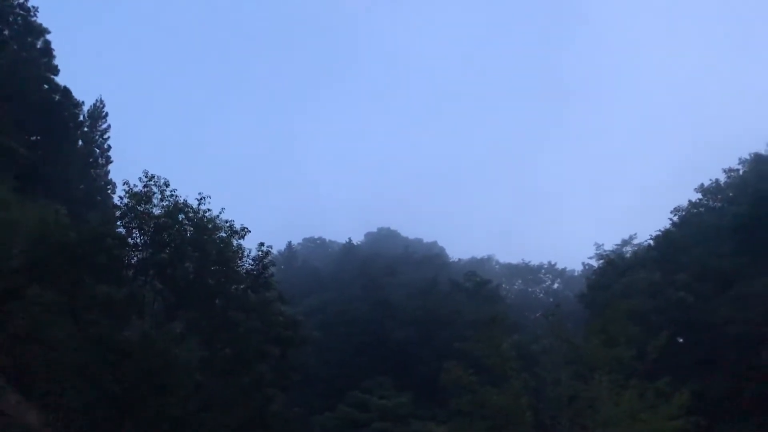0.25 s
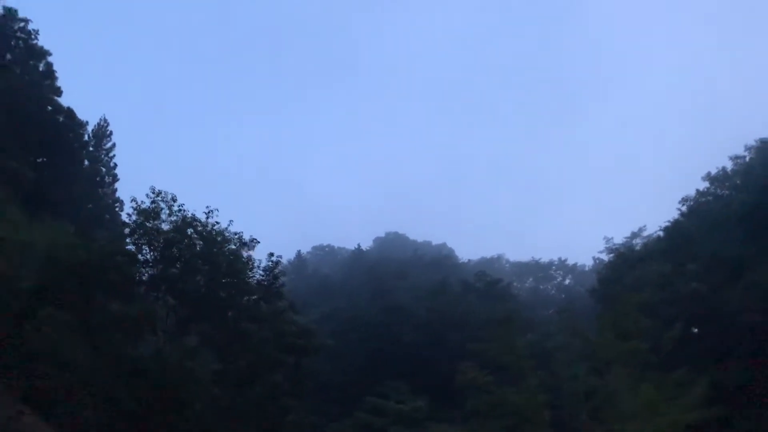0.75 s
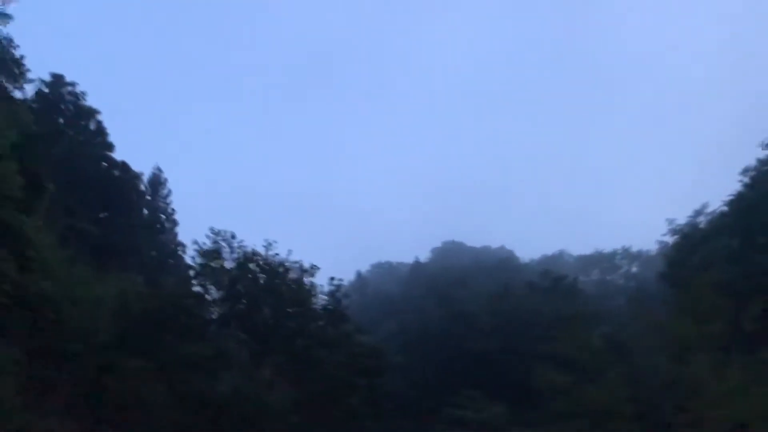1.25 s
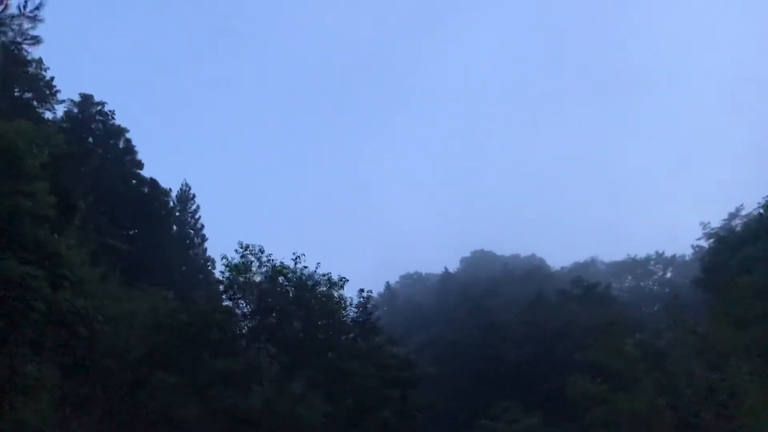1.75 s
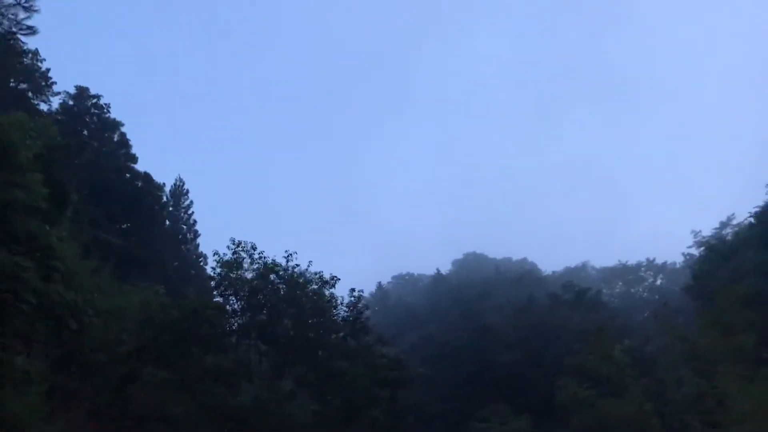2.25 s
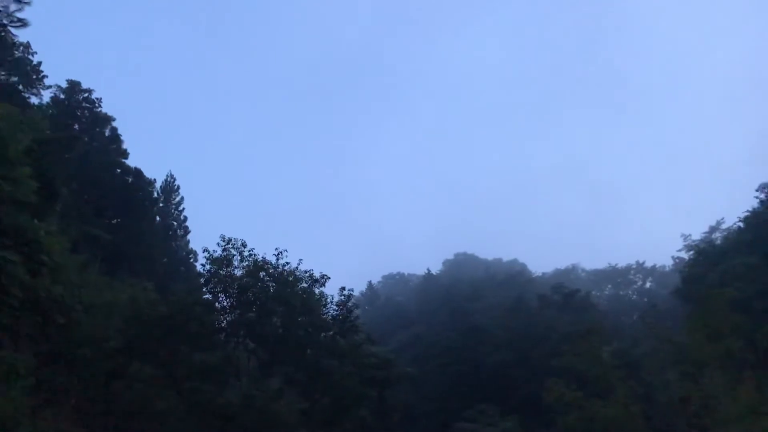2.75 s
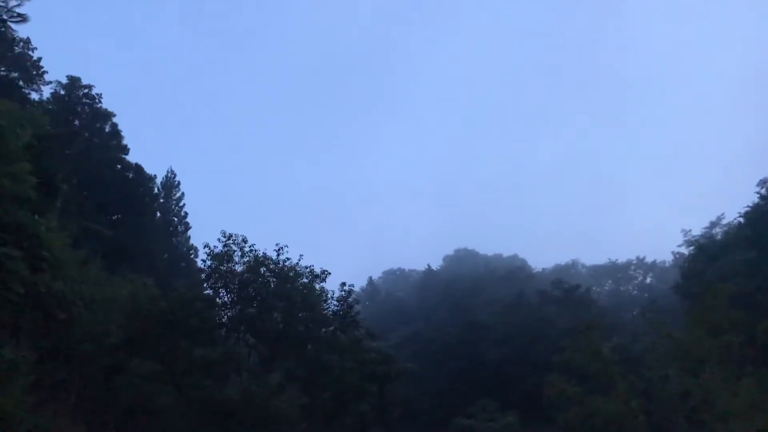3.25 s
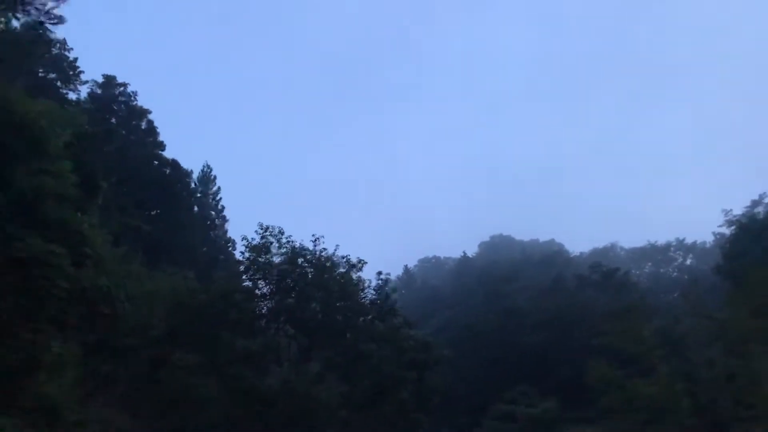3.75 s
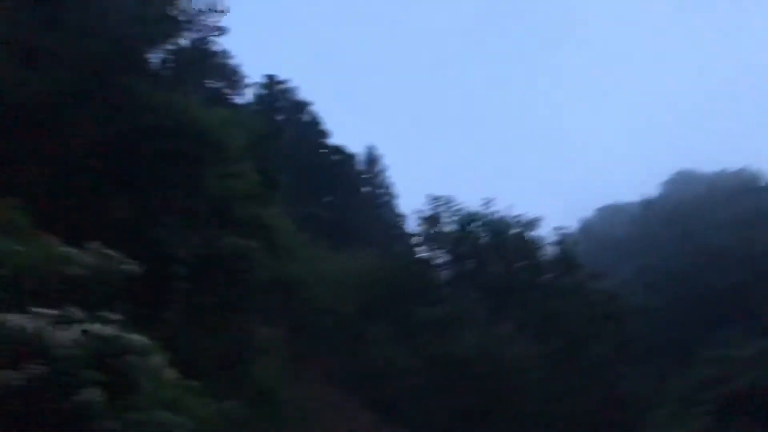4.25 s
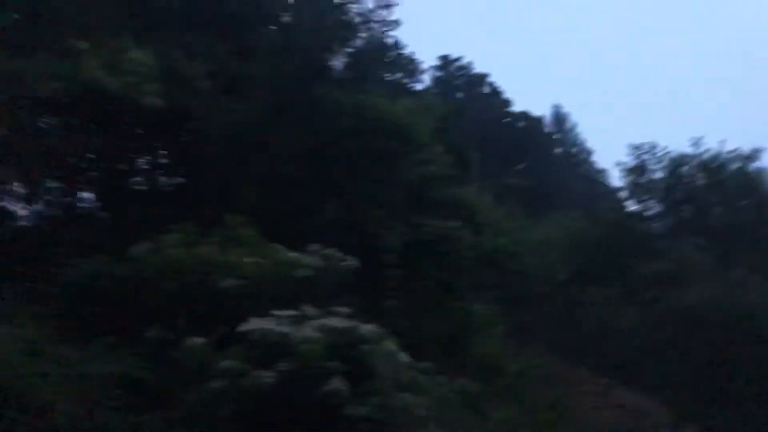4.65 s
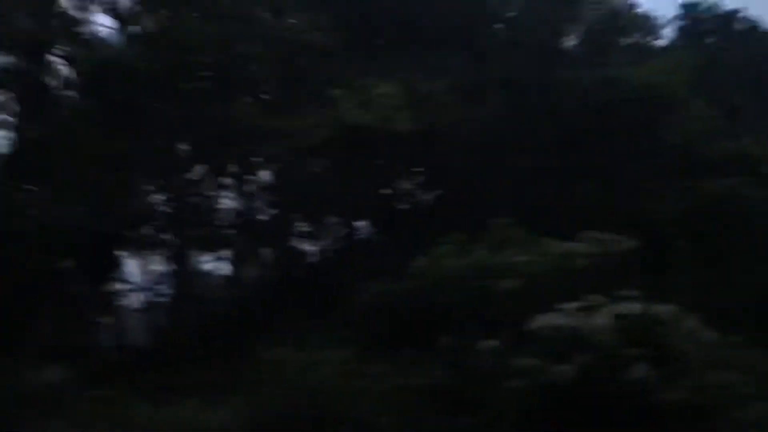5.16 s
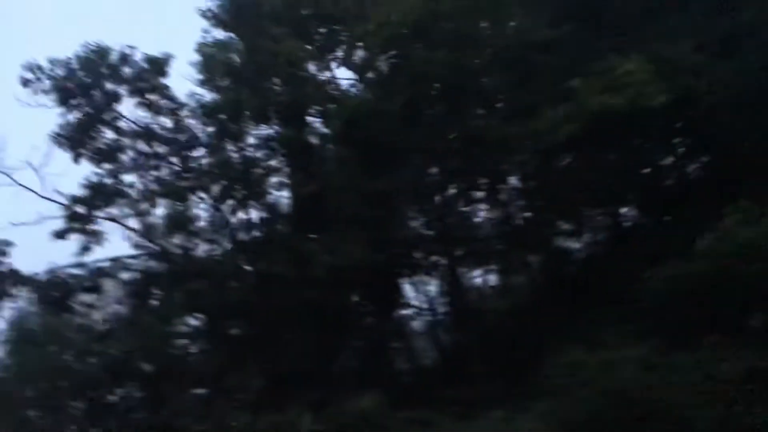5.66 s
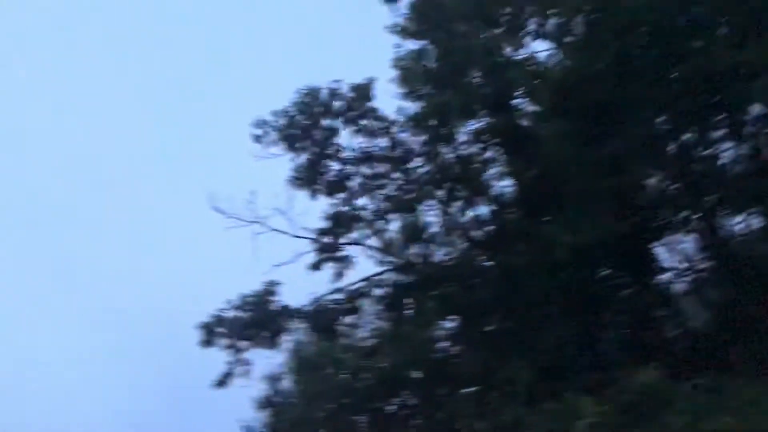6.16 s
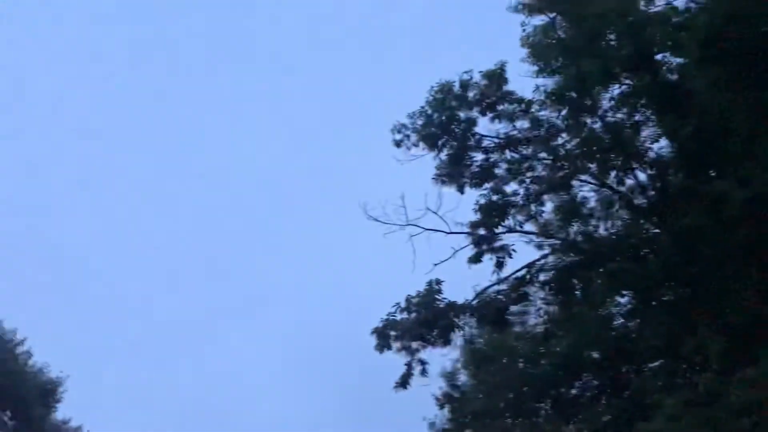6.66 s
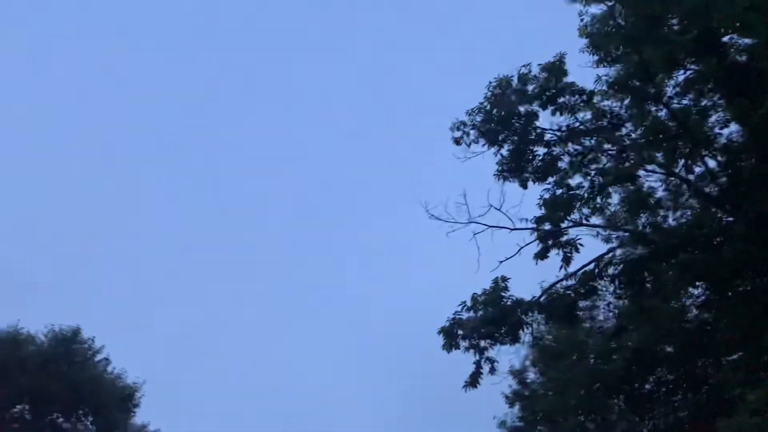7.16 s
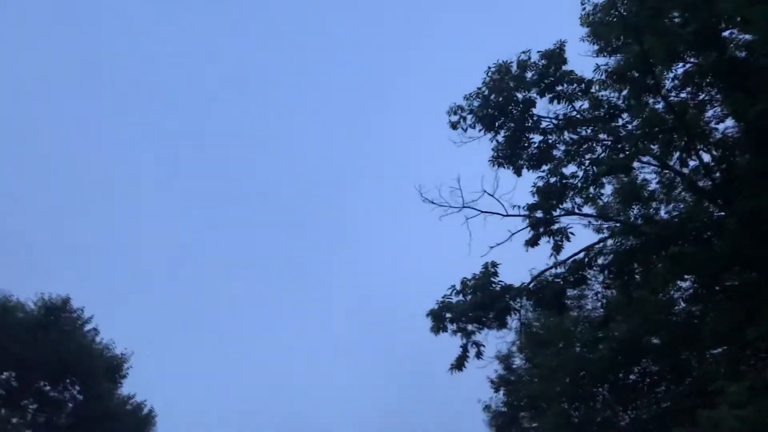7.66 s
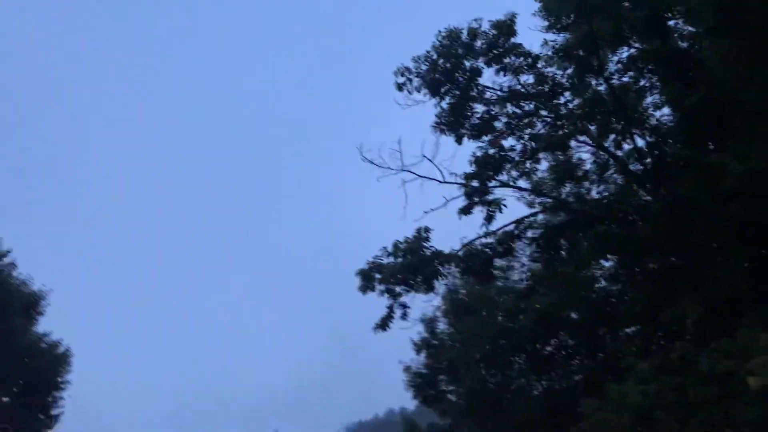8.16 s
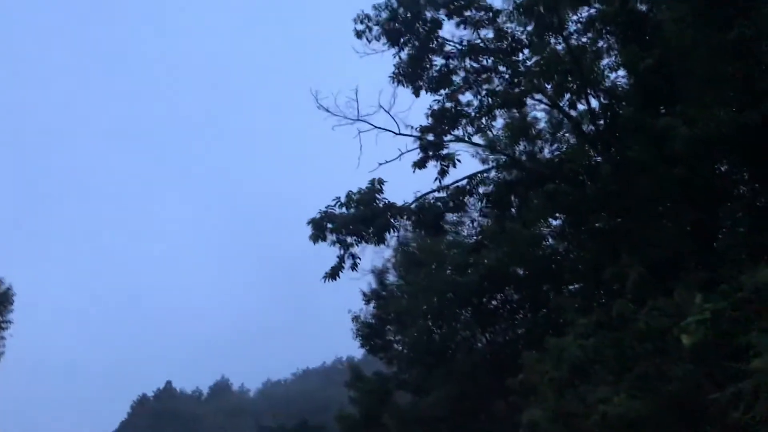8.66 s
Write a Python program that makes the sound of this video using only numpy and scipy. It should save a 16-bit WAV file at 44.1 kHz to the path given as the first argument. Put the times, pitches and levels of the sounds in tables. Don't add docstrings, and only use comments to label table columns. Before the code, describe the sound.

A distant, blurred cicada chorus fills the valley from the start while three closer cicadas pile up into a dense, shimmering pulse. One drops out around four seconds, the others slow and end by about six and a half. Softer answers from across the slopes then carry on, gradually slowing. Small thin bird whistles, a high insect buzz, leaf hiss and barely audible traffic sit behind, in natural outdoor reverberation.

```python
import sys
import numpy as np
from scipy import signal
from scipy.fft import rfft, irfft, next_fast_len
from scipy.io import wavfile
from scipy.ndimage import map_coordinates

SR = 44100
rng = np.random.default_rng(int(sys.argv[2]) if len(sys.argv) > 2 else 0)


def master(y):
    cut = np.clip(np.atleast_2d(y).T, -1, 1)
    pcm = np.round(cut * 32767)
    wavfile.write(sys.argv[1], SR, pcm.astype(np.int16))


def rack_gain(trim_db):
    fader = np.asarray(trim_db, float)
    return 10 ** (fader / 20)


N = 392931
TIME = np.arange(N) / SR


def unit(x):
    return x / np.sqrt(np.mean(np.abs(x) ** 2) + 1e-20)


def along(points, hz):
    f, v = np.transpose(points)
    return np.interp(np.log(hz + 1), np.log(f + 1), v)


def over_time(points):
    return np.interp(TIME, *np.transpose(points))


def wobble(rate):
    return map_coordinates(rng.standard_normal(int(N * rate / SR) + 4), [TIME * rate], order=1)


def coloured(x, spectrum):
    m = next_fast_len(N + 8192)
    gain = rack_gain(along(spectrum, np.fft.rfftfreq(m, 1 / SR)))
    return irfft(rfft(x, m) * gain, m)[:N]


def hiss(spectrum):
    return unit(coloured(rng.standard_normal(N), spectrum))


def swell(t, length, rise, fall):
    nearest_end = np.minimum(t / rise, (length - t) / fall)
    return np.sin(np.pi / 2 * np.clip(nearest_end, 0, 1)) ** 2


# (level/dB, share of the brightness 0-1, fuzz level/dB,
# fuzz offset below the line f/Hz, fuzz width f/Hz)
PARTIALS = [(-7, 0, -1.5, 45, 290), (1.5, 0.14, 1, 61, 240), (-3.5, 0.38, 6, 150, 370),
            (-1, 0.96, 5, 134, 250), (-10, 0.74, 5.5, 240, 550), (-23, 0.6, 11.5, 310, 490),
            (-26.5, 0.9, 1, 460, 750)]


def rib_fuzz():
    hz = np.fft.fftfreq(next_fast_len(N), 1 / SR)
    pedestal_db, pedestal_wider = -21, 5.37
    out = []
    for _, _, db, below_hz, width_hz in PARTIALS:
        noise = rng.standard_normal(len(hz)) + 1j * rng.standard_normal(len(hz))
        x = (hz + below_hz) / width_hz
        hump = 1 / (1 + x ** 4) + rack_gain(pedestal_db) / (1 + (x / pedestal_wider) ** 4)
        out.append(unit(np.fft.ifft(noise * hump)[:N]) * rack_gain(db))
    return out


# (multiple of the stroke rate, level/dB)
STROKE = [(-2, -36), (-1, -20), (1, -28), (2, -36)]


def tymbal(hz, gains, ribs, rough, stroke_db, waver, fuzz):
    n = len(hz)
    grows_db = 3
    turn = 2 * np.pi * np.cumsum(hz * (1 + waver * wobble(90)[:n])) / SR
    beat = turn / ribs + .6 * wobble(70)[:n]
    side_lines = sum(rack_gain(db) * np.exp(1j * m * beat) for m, db in STROKE)
    stroke = rack_gain(stroke_db - 2 * grows_db) * side_lines
    first = np.exp(1j * turn)
    partial, out = 1, 0
    for gain, smear in zip(gains, fuzz):
        partial = partial * first * np.exp(2j * np.pi * rng.uniform())
        stroke = stroke * rack_gain(grows_db)
        jitter = rough * np.roll(smear, rng.integers(N))[:n]
        out = out + gain * np.real(partial * (1 + stroke + jitter))
    return np.sqrt(2) * out


FAR_PARTIALS = [-4, 3, -12, -6.5, -38]
# (t/s, level/dB)
CHORUS = [(0.0, -41.5), (0.4, -46.5), (0.94, -41.5), (1.41, -42), (1.61, -42), (2.36, -45), (2.9, -43.5),
          (4.42, -42), (4.52, -43), (7.2, -46.5), (7.84, -45.5), (8.91, -48.5)]


def chorus(fuzz, count=9):
    out = 0
    for place, (beat, start) in zip(np.linspace(-1, 1, count), rng.uniform(-1, 1, (count, 2))):
        cycle = (TIME * (7.6 + 0.7946 * beat) + start) % 1
        gate = swell(cycle, 0.53, rise=0.087, fall=0.4) * rack_gain(1.6 * wobble(0.51))
        hz = (2115 + 75 * place) * (1 + .009 * wobble(1.2))
        voice = tymbal(hz, rack_gain(FAR_PARTIALS), ribs=7.3, rough=0.64, stroke_db=11.0, waver=0.001938, fuzz=fuzz)
        out = out + gate * voice
    return rack_gain(over_time(CHORUS) - 6.0) * unit(out)


# (f/Hz, density level/dB per Hz)
BUZZ = [(3240, -45.5), (5500, -57), (6170, -7), (6660, -8.5), (7560, 1), (8820, 0), (9080, -13),
        (9220, -6.5), (10000, -22), (10300, -19), (13400, -53), (22000, -120)]
# (start f/Hz, end f/Hz)
TOOTH_HZ = (6500, 9500)
# (t/s, level/dB)
CRICKET = [
    (3.5, -60),
    (6, -55),
]


def bush_cricket():
    tooth_rate = 455
    teeth = np.diff(np.floor(tooth_rate * TIME), prepend=0)
    ring = signal.chirp(TIME[:SR // tooth_rate], TOOTH_HZ[0], 1 / tooth_rate, TOOTH_HZ[1])
    teeth = np.convolve(teeth, ring)[:N]
    flutter = np.exp(3j * np.cos(2 * np.pi * 102 * TIME + .3 * wobble(5)))
    clicks = signal.hilbert(coloured(teeth, BUZZ), next_fast_len(N))[:N]
    near = rack_gain(over_time(CRICKET)) * unit(np.real(clicks * flutter ** 0.55))
    further = rack_gain(-48 + 0.48 * wobble(130) + 0.52 * wobble(5.8)) * hiss(BUZZ)
    return further + near


# (f/Hz, density level/dB per Hz)
AIR = [(14, -52), (24, -17), (41, -10), (59, 0.5), (86, -3), (129, -3), (156, -11), (376, -16.5),
       (439, -21.5), (589, -19), (1240, -24), (1500, -27), (1950, -16), (3300, -120)]
# (f/Hz, density level/dB per Hz)
LEAVES = [(1000, -120), (1400, -29), (3000, -10.5), (5500, 1.5), (10500, 0), (11500, -4.5), (15700, -9.5)]
# (f/Hz, density level/dB per Hz)
ROAD = [(60, -30), (120, 4), (250, 2), (450, -4), (900, -34), (2000, -120)]
# (t/s, level/dB)
TRAFFIC = [(0.1, -71.5), (0.35, -69), (1.41, -67.5), (1.46, -75.5), (5.5, -78), (6.2, -72), (7.2, -73),
           (8.2, -72.5), (8.4, -75.5), (8.91, -70.5)]


def air():
    road = rack_gain(over_time(TRAFFIC) + 1.65 * wobble(6.5)) * hiss(ROAD)
    return rack_gain(-65.5) * hiss(AIR) + road + rack_gain(-64.5) * hiss(LEAVES)


def singer(rows, pitch, fuzz, ribs, stroke_db, length, top_db):
    s, db, bright, rough_db = np.transpose(rows)
    span = slice(max(0, int((s[0] - .1) * SR)), int((s[-1] + .1) * SR))
    t = TIME[span]
    near = np.searchsorted((s[1:] + s[:-1]) / 2, t)
    since = t - s[near] + 0.026
    gate = swell(since, length, rise=.015, fall=.026)
    gains = []
    for k, row in enumerate(PARTIALS):
        level = db + row[0] + row[1] * bright + top_db * (k > 3)
        gains.append(gate * rack_gain(level)[near])
    arch = 1.001 - .004 * np.clip(1.7 * since / length - 1.05, -1.1, 1) ** 2
    hz = np.interp(s, *np.transpose(pitch))[near] * arch
    stroke_db = stroke_db + 7 * np.exp(-(t - s[0]) / 0.84)
    out = np.zeros(N)
    out[span] = tymbal(hz, gains, ribs, rack_gain(rough_db)[near], stroke_db, waver=0.00047, fuzz=fuzz)
    return out


# (first t/s, last t/s, gap t/s, slowing t/s, first f/Hz, last f/Hz)
PHRASES = [
    (.06, .6, .12, 0, 2135, 2125),
    (4.22, 5.6, .115, 0, 2300, 2265),
    (5.74, 8.9, .119, .0004, 2225, 2176),
    (6.03, 8.9, .136, 0, 2140, 2118),
    (7.64, 8.9, .125, 0, 2255, 2236),
]
# (second partial level/dB, fourth over second level/dB)
PHRASE_LEVELS = [(-49, -20), (-60, -11), (-52, -19.5), (-56.5, -16), (-58.5, -29)]


def neighbours(fuzz):
    out = 0
    for (start, end, gap, slowing, high, low), (db, bright) in zip(PHRASES, PHRASE_LEVELS):
        n = np.arange(40)
        s = start + gap * n + slowing * n * n
        size = db + 1.2 * rng.standard_normal(len(n))
        rows = [(at, level, bright, -9) for at, level in zip(s, size) if at < end]
        pitch = [(start, high), (end, low)]
        out = out + singer(rows, pitch, fuzz, ribs=6.5, stroke_db=-29.0, length=0.059, top_db=3.0)
    return out


# (level/dB, brightness level/dB, roughness level/dB)
SCATTER_DB = [1.0, 1.2, 2]


def phrase(marks, rows, end):
    rough_db, rough_per_db, firm_db = -14, .85, -36
    n = np.arange(marks[-1] + 1)
    even = np.transpose([np.interp(n, marks, column) for column in np.transpose(rows)])
    s, db, bright = np.vstack([even, *end]).T
    scatter = (rng.standard_normal((len(s), 3)) * SCATTER_DB).T
    level, colour, grit = scatter * (np.arange(len(s)) < len(n))
    rough = rough_db + rough_per_db * (firm_db - db) + grit
    return np.transpose([s, db + level, bright + colour, rough])


# (middle t/s, second partial level/dB, fourth over second level/dB)
HIGH_SINGER = [(0.33, -49.5, -17), (0.648, -42.5, -6.5), (1.007, -47, -2), (1.881, -38, -13),
               (2.666, -41.5, -11.5), (3.309, -47, -4), (3.44, -47, -2.5), (4.036, -50, -0.5)]
HIGH_END = [(4.217, -58, -1), (4.374, -50, 3.5), (4.6, -43, -3), (4.827, -45.5, 2), (5.086, -43.5, 2),
            (5.417, -43, -1)]
LOUD_SINGER = [(0.905, -36.5, -6), (1.241, -41.5, 5), (1.723, -37, -1.5), (1.855, -35, -3.5),
               (2.505, -35, -2.5), (2.766, -38.5, -2.5), (3.476, -41.5, 5.5), (3.828, -45, 5.5),
               (4.157, -39.5, 0.5)]
LAST_SINGER = [(0.69, -44.5, -12), (1.264, -35.5, -2.5), (2.001, -45, 1.5), (2.639, -45, 4.5),
               (3.377, -45.5, 4), (3.775, -46, 5.5), (4.345, -46, 6), (4.5, -45, 2), (4.838, -47, 0)]
LAST_END = [(5.039, -48.5, 5.5), (5.312, -45.5, -0.5), (5.633, -46, 2), (5.817, -51, -20),
            (5.98, -50, -1.5), (6.109, -71, -20), (6.389, -48, -4.5)]
HIGH_MARKS = [0, 3, 6, 13, 19, 24, 25, 29]
LOUD_MARKS = [0, 3, 7, 8, 13, 15, 20, 22, 23]
LAST_MARKS = [0, 5, 11, 16, 22, 25, 29, 30, 32]
# (t/s, f/Hz)
HIGH_PITCH = [(0.33, 2175), (0.54, 2235), (0.65, 2256), (0.883, 2253), (1.257, 2235), (2.015, 2217),
              (3.18, 2204), (4.038, 2186), (5.41, 2139)]
LOUD_PITCH = [(0.905, 2166), (1.015, 2190), (1.13, 2190), (1.479, 2175), (1.856, 2158), (2.637, 2150),
              (3.041, 2134), (3.48, 2124), (4.155, 2098)]
LAST_PITCH = [(0.693, 2112), (0.92, 2155), (1.142, 2156), (1.631, 2136), (2.0, 2127), (2.759, 2118),
              (4.348, 2107), (5.63, 2077), (6.388, 2073)]


def near_singers(fuzz):
    high = phrase(HIGH_MARKS, HIGH_SINGER, HIGH_END)
    loud = phrase(LOUD_MARKS, LOUD_SINGER, [])
    last = phrase(LAST_MARKS, LAST_SINGER, LAST_END)
    out = singer(high, HIGH_PITCH, fuzz, ribs=5.3, stroke_db=4.5, length=0.065, top_db=1.0)
    out = out + singer(loud, LOUD_PITCH, fuzz, ribs=6.6, stroke_db=-3.5, length=0.054, top_db=1.0)
    return out + singer(last, LAST_PITCH, fuzz, ribs=6.3, stroke_db=2.5, length=0.063, top_db=-1.0)


def add_tone(out, start, db, shape, hz):
    tone = np.sin(2 * np.pi * np.cumsum(hz) / SR)
    out[round(start * SR):][:len(hz)] += np.sqrt(2) * rack_gain(db) * shape * tone


# (start
# t/s, length t/s, from f/Hz, to f/Hz)
SLIDES = [(.355, .04, 3700, 2400), (6.33, .03, 5200, 4500), (6.63, .03, 5000, 4500),
          (6.75, .035, 5200, 4500), (7.21, .05, 4500, 5200), (7.39, .04, 4600, 5200),
          (7.67, .07, 4800, 4880), (7.74, .04, 3800, 3450), (7.78, .022, 3450, 2600),
          (7.805, .02, 2800, 3200), (8.33, .36, 5230, 5350), (1.65, .07, 3400, 3370),
          (1.78, .08, 3400, 3390)]
SLIDE_LEVELS = [-69, -66, -68, -66, -64, -65, -59, -66, -67, -71, -61, -66, -69]


def bird_slides():
    hoarse_hz, hoarse_hz_per_s = 50, 330
    out = np.zeros(N + SR)
    for (s, length, start, end), db in zip(SLIDES, SLIDE_LEVELS):
        t = np.arange(int(length * SR)) / SR
        hoarse = (hoarse_hz + hoarse_hz_per_s * length) * wobble(700)[:len(t)]
        hz = start + (end - start) * t / length + hoarse
        add_tone(out, s, db, swell(t, length, .25 * length, .25 * length), hz)
    return out[:N]


# (start t/s, length t/s, top f/Hz)
WHISTLES = [(1.275, .06, 3240), (1.588, .096, 3420), (2.905, .075, 2980), (3.535, .075, 2990),
            (4.054, .08, 3010), (4.49, .096, 3400), (5.285, .078, 2970), (6.153, .07, 2990),
            (6.743, .072, 3000), (7.262, .096, 3400)]
WHISTLE_LEVELS = [-66, -64, -67, -63, -61, -60, -62.5, -62.5, -62, -62]


def bird_whistles():
    out = np.zeros(N + SR)
    for (s, length, top), db in zip(WHISTLES, WHISTLE_LEVELS):
        t = np.arange(int(length * SR)) / SR
        u = t / length
        rise = .125 * np.exp(-u / .17)
        drop = .19 * np.clip((u - .8) / .2, 0, 1) ** 1.3
        fade_db = -9 * np.clip(1 - u / .5, 0, 1) - 7 * np.clip((u - .82) / .04, 0, 1)
        add_tone(out, s, db, swell(t, length, .01, .005) * rack_gain(fade_db), top * (1.005 - rise - drop))
    return out[:N]


# (f/Hz, t60 t/s)
VALLEY = [(1500, 1.25), (5000, 1.24), (9000, 0.73), (12000, 0.33)]


def valley(x):
    hz, t, z = signal.stft(rng.standard_normal(SR), SR, nperseg=256)
    decay = rack_gain(-60 * t / along(VALLEY, hz)[:, None])
    tail = signal.istft(z * decay, SR, nperseg=256)[1]
    return signal.fftconvolve(np.pad(x, (600, 0)), tail / np.linalg.norm(tail))[:N]


# (f/Hz, level/dB)
BODY = [(1000, -34), (1500, -7.5), (1750, -6.5), (2000, -0.5), (3000, -1), (3600, -5), (4000, -0.5),
        (5250, 4), (5900, 0), (16000, 0)]


def scene():
    fuzz = rib_fuzz()
    far = coloured(chorus(fuzz), BODY)
    middle = coloured(neighbours(fuzz), BODY)
    near = coloured(near_singers(fuzz), BODY)
    calls = bird_slides() + bird_whistles()
    echo = valley(rack_gain(-8) * near + rack_gain(-2.5) * middle + rack_gain(-1.5) * far)
    echo = echo + rack_gain(-6.5) * valley(calls)
    return (near + middle + calls + rack_gain(-3.0) * far + echo + bush_cricket() + air())[None]


def top_cut(x):
    return signal.sosfilt(signal.butter(12, 15720, fs=SR, output="sos"), x)


def record(dry):
    return top_cut(dry)


dry = scene()
out = record(dry)
master(out)
```